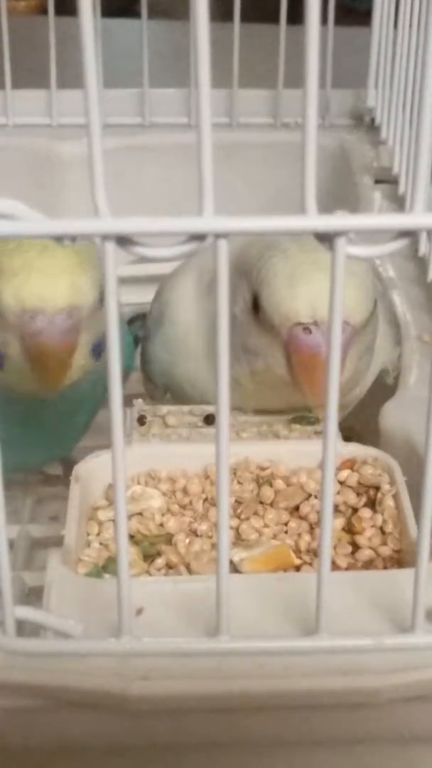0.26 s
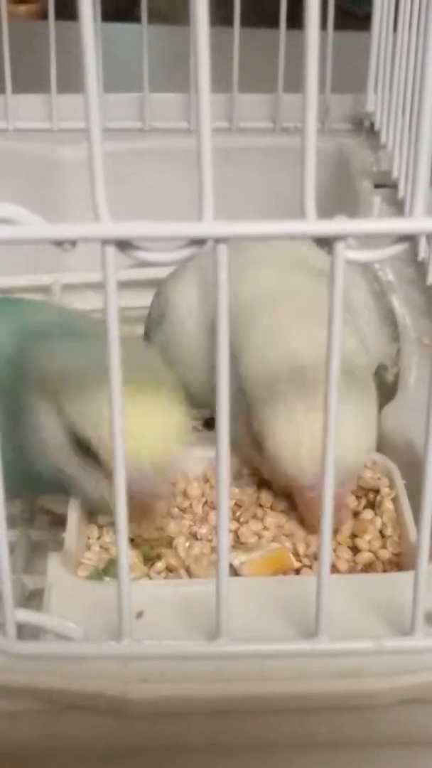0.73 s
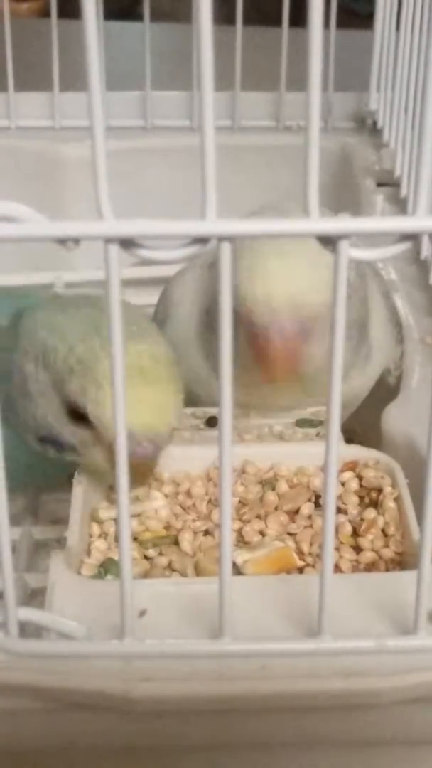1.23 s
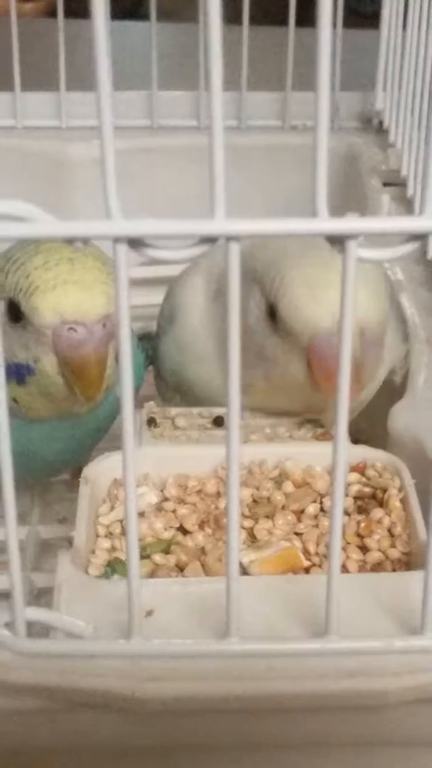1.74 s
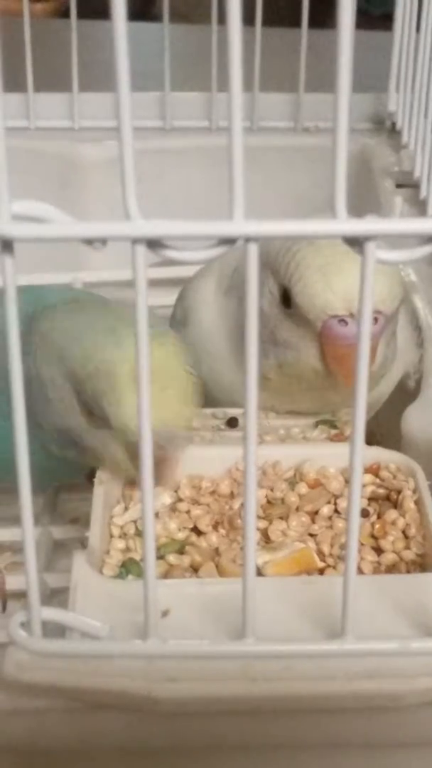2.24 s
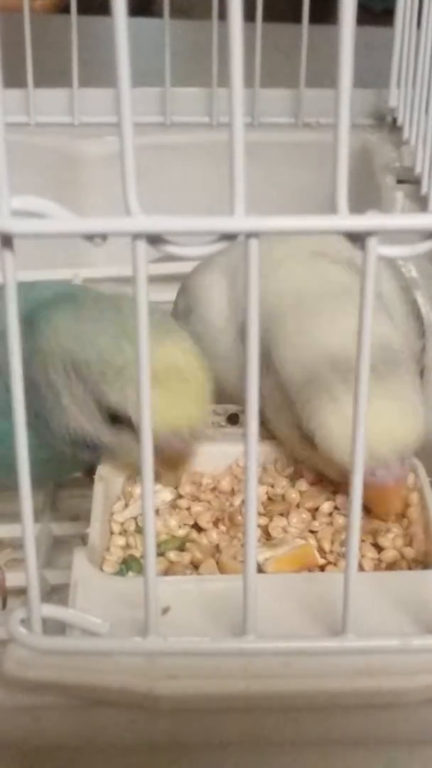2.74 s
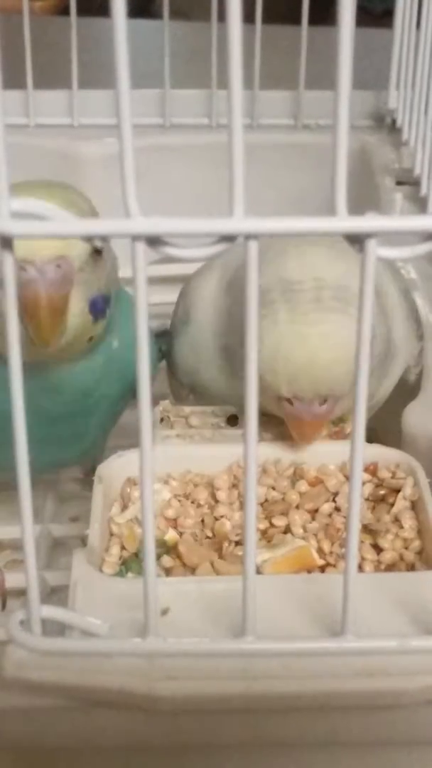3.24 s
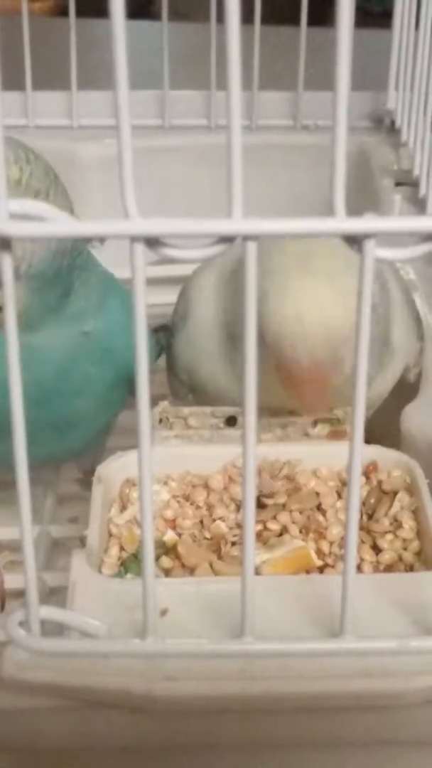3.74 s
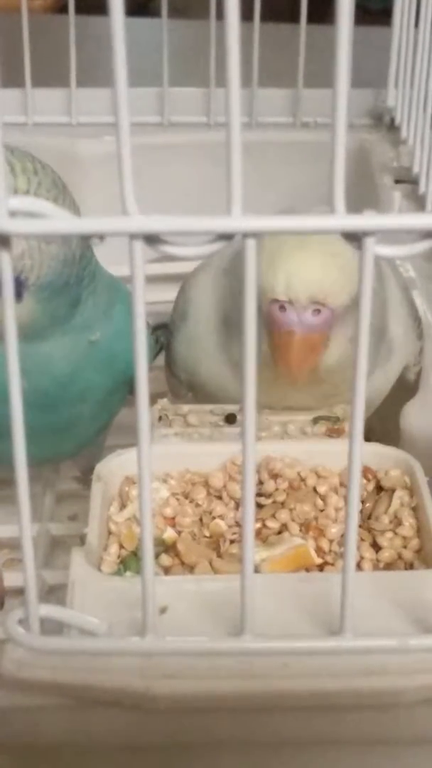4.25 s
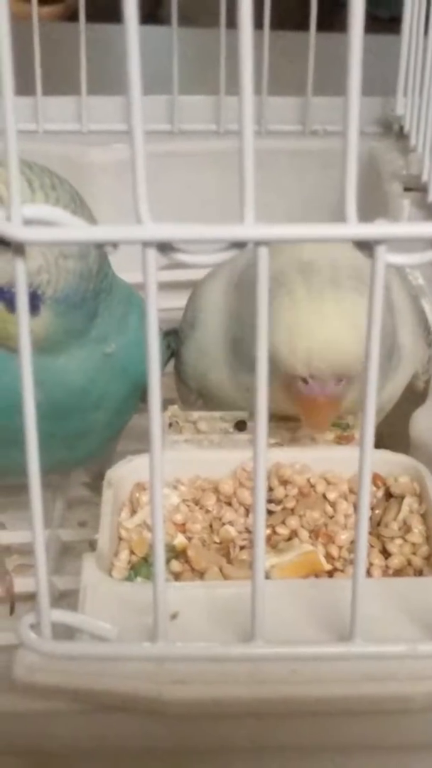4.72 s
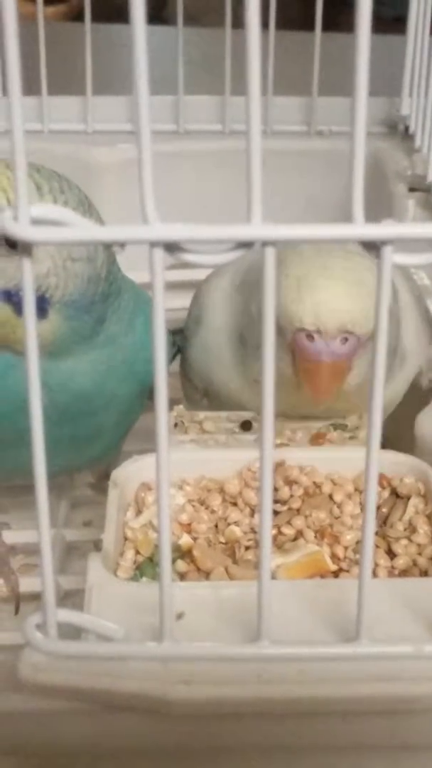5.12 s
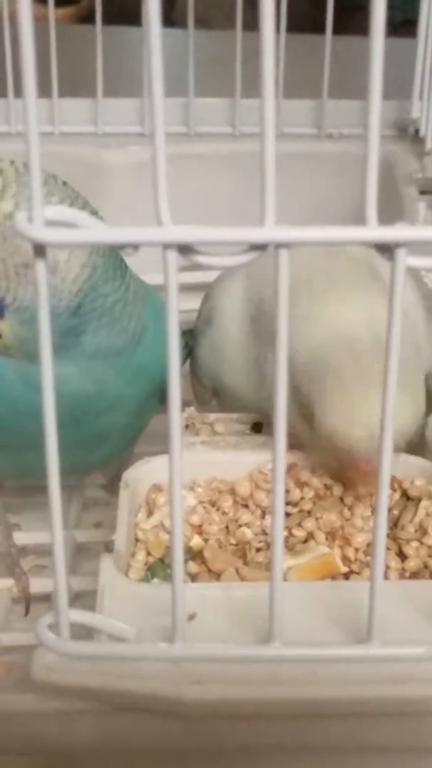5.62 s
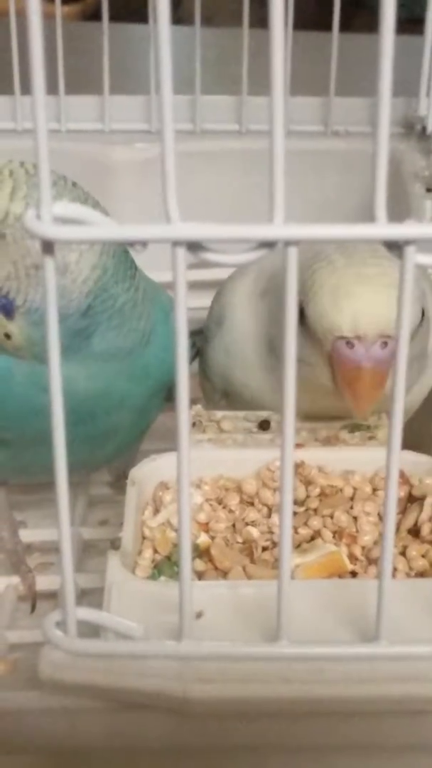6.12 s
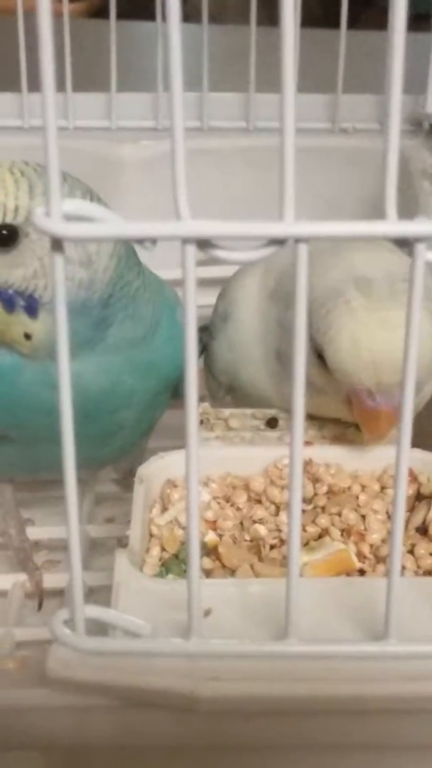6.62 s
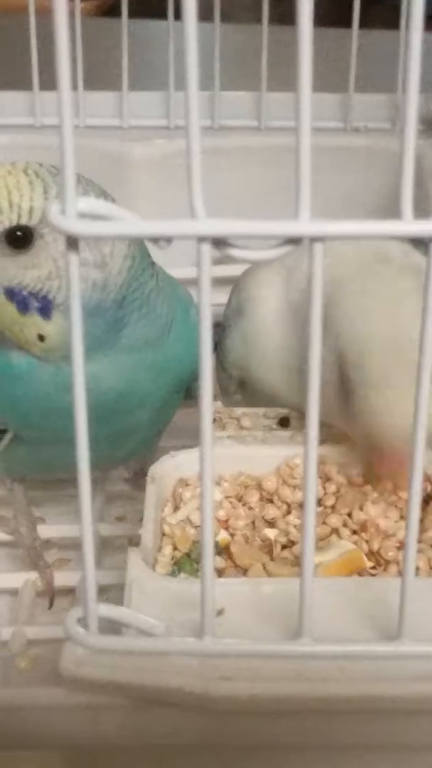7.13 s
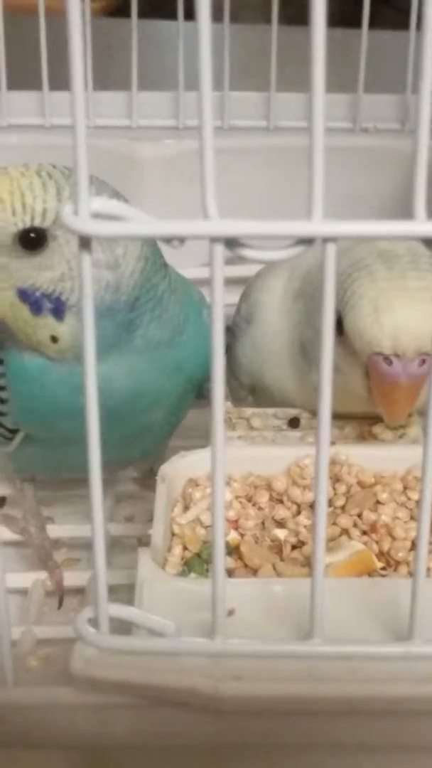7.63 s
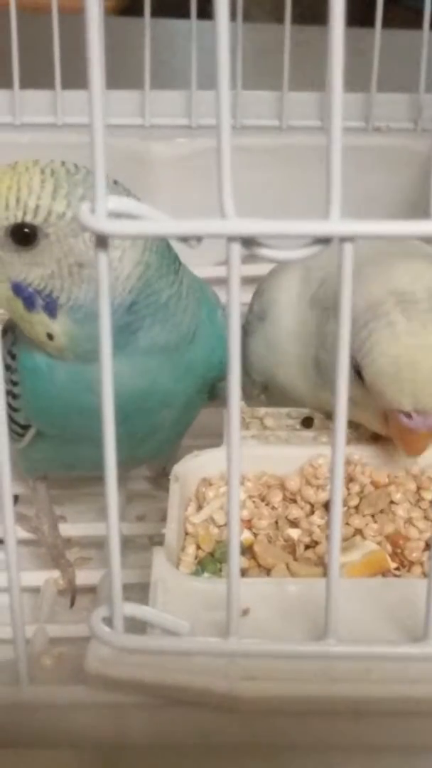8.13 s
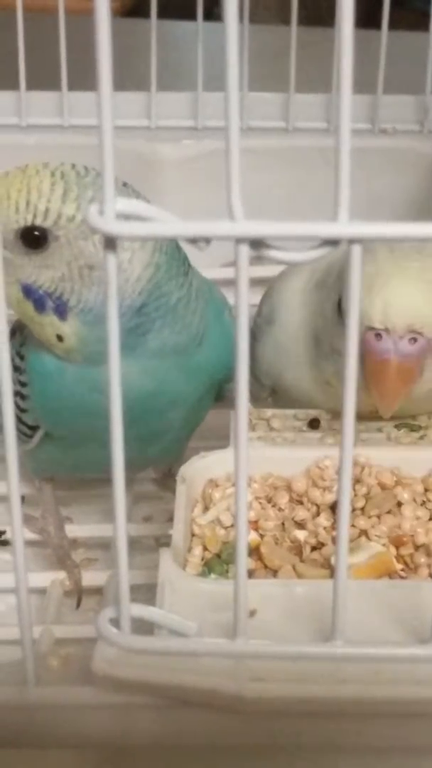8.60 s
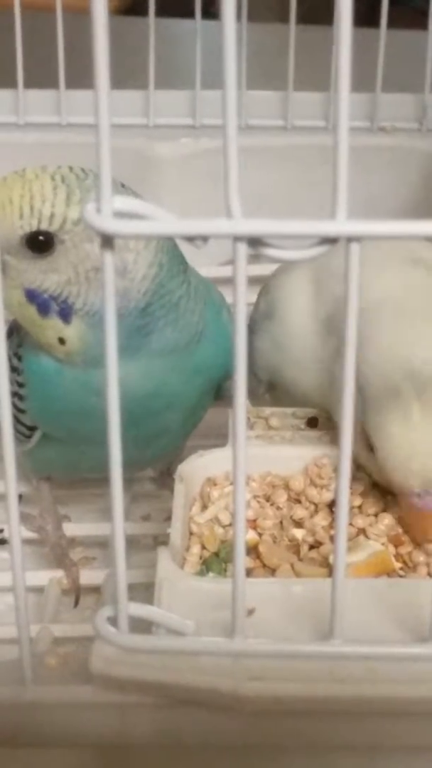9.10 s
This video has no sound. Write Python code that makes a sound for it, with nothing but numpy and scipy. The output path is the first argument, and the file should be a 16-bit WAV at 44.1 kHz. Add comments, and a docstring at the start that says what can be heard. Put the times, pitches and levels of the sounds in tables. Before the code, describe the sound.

Two parakeets feed in a wire cage indoors. Dry, bright husk snaps come irregularly from the start, singly and in tight clusters. Beaks dig into the seed heap with brief grainy rustles and sometimes knock the plastic dish, with dull low thuds as the cage sways. A steady low motor hum and soft hiss lie beneath, heard by a close phone microphone in a small room.

```python
"""Two small parakeets husk seeds at a plastic dish in a wire cage, close to a phone microphone.
A household motor hums from start to end, as sines and narrow noise over the room's air noise.
Husks snap from the first moment on, as short noise bursts through resonances, and echo off near walls.
From 0.7 s on beaks dig in the seed heap, as dense grains, and knock the dish, a push that rings it.
From 0.9 s on lunges sway the cage, as low sine swells; the last husks snap at about 9 s."""
import sys
import numpy as np
from scipy import signal
from scipy.fft import rfft, irfft, next_fast_len
from scipy.io import wavfile
from scipy.ndimage import map_coordinates

SR = 44100
rng = np.random.default_rng(int(sys.argv[2]) if len(sys.argv) > 2 else 0)


def boost(x):
    """Linear amplitude factor 10**(x/20) for a level x in decibels (scalar or array-like)."""
    u = np.asarray(x, float) / 20
    return 10 ** u


def output_pcm(signal):
    """Save a mono or channel-first signal as 16-bit PCM at the path in sys.argv[1].

    Samples are clipped to [-1, 1] before scaling.
    """
    pcm = np.clip(np.atleast_2d(signal).T, -1, 1) * 32767
    wavfile.write(sys.argv[1], SR, np.round(pcm).astype(np.int16))


N = 412776

# husk snaps: (t/s, hollow part level/dB, body part level/dB, sharp part level/dB, brightness of the body/dB)
# a part's level is the rms it would have with all its energy within 1 ms
SNAPS = [(0.0353, -58, -54.5, -56, 1), (0.272, -60, -52, -51, -10), (0.4174, -78, -62, -57, -2),
         (0.4847, -62, -59.5, -59, 4), (0.5051, -73, -60, -56, 2), (0.6978, -48, -53, -68, 15),
         (0.891, -63, -58, -69, 1), (0.9306, -71, -60, -62, -3), (0.9398, -70, -59, -64, -5),
         (0.945, -70, -51, -56, 1), (0.9644, -51, -39, -41, -1.5), (0.9696, -79, -52, -45, 4),
         (1.0152, -53.5, -62, -72, 1), (1.235, -64, -51, -62, 10), (1.2896, -50.5, -44, -49, 9),
         (1.311, -69, -53, -62, -10), (1.4533, -56, -43.5, -47, 9), (1.458, -45.5, -41.5, -34, -2),
         (1.474, -67, -62, -69, -1), (1.7336, -63, -56, -70, -2), (1.783, -62, -52.5, -72, 4),
         (1.9066, -51.5, -43.5, -42, 0), (1.965, -56, -47.5, -55, 5), (1.9915, -50, -56, -58, 4),
         (2.2474, -53.5, -58, -58, -8), (2.476, -51.5, -49.5, -51.5, 0), (2.482, -55, -59, -72, 1),
         (2.6125, -53.5, -48.5, -39, 5), (2.826, -74, -55, -72, 11), (2.8346, -68, -54.5, -74, 4),
         (2.9303, -64, -66, -60, 5), (2.9609, -69, -64, -58, -4), (3.107, -47.5, -47.5, -48, 5),
         (3.1148, -59, -69, -60, -5), (3.251, -54, -58, -68, 6), (3.2647, -57, -41, -46, 7),
         (3.638, -72, -56, -65, 13), (3.6413, -67, -57.5, -66, 3), (4.1028, -63, -61, -69, 6),
         (4.106, -64, -56, -59, 5), (4.111, -67, -61, -65, -3), (4.367, -48, -48, -55, 6),
         (4.4048, -70, -39.5, -48, 4), (4.5064, -45, -47.5, -43, 7), (4.5607, -55, -59, -66, 5),
         (4.658, -56, -47.5, -54, -1), (4.683, -73, -51, -60, 12), (4.686, -73, -48.5, -47, 9),
         (4.768, -55.5, -48, -64, 3), (5.057, -51, -57, -76, -9), (5.212, -57, -52, -60, -4),
         (5.2144, -46.5, -50, -55, 5), (5.2441, -62, -50, -59, 3), (5.2489, -67, -69, -59, 4),
         (5.3029, -58, -56, -65, 8), (5.3572, -49.5, -39.5, -49, -4), (5.392, -76, -59, -56, 5),
         (5.6294, -59, -53.5, -64, 6), (5.769, -60, -55.5, -64, -2), (6.0016, -58, -55, -65, 9),
         (6.1568, -51.5, -47.5, -47.5, -6), (6.2471, -79, -60, -63, 7), (6.3071, -71, -63, -64, 0),
         (6.349, -68, -58, -68, -5), (6.3532, -72, -55, -60, -6), (6.364, -53, -48.5, -54, -12),
         (6.4273, -61, -63, -58, 13), (6.665, -59, -55, -59, -3), (6.685, -60, -56, -70, -10),
         (6.7146, -60, -54, -63, 5), (6.8792, -61, -55.5, -60, -1), (7.171, -71, -58, -72, 9),
         (7.297, -56, -61, -70, 1), (7.3482, -63, -57.5, -71, 1), (7.4, -51, -48, -59, -15),
         (7.405, -48.5, -43.5, -40.5, 0), (7.4462, -64, -53, -54, 7), (7.5, -60, -58, -49, -5),
         (7.5038, -61, -49.5, -54, -9), (7.539, -58, -55.5, -53, 1), (7.7935, -55.5, -48.5, -53, -5),
         (7.8495, -61, -43, -44.5, 7), (7.8575, -67, -52, -59, -5), (7.8883, -79, -78, -56, 1),
         (8.004, -72, -56, -53, 5), (8.0233, -60, -47.5, -53, 9), (8.027, -56, -53, -50, 8),
         (8.0827, -80, -59, -71, 7), (8.364, -81, -57, -65, 8), (8.7259, -60, -55, -50, -3),
         (8.7838, -50, -43.5, -50, 2), (8.8426, -61, -58, -65, 5), (8.9317, -56, -52, -51, 3),
         (8.9347, -65, -57, -56, 9), (9.0023, -55, -46.5, -68, -9), (9.0445, -52.5, -47, -71, 2),
         (9.1935, -62, -57, -63, 9)]
# resonances of the sharp, highest part of a snap: (f/Hz, width/Hz, level/dB)
SHARP_MODES = [(9500, 5000, -0.5), (13300, 1500, 7), (15040, 2200, 6.5)]
# resonances of the plastic dish: (f/Hz, width/Hz, level/dB of a single pass)
DISH_MODES = [(302, 110, -2.5), (502, 100, 3), (663, 120, 1), (808, 190, 0), (1100, 370, -8),
              (1500, 250, -5.5), (2210, 210, -8.5), (3100, 370, -11.5)]
# a beak digs into the seed heap: (t/s of full strength, hold/s, hollow rustle level/dB, body rustle level/dB)
DIGS = [(.705, 0.0085, -73, -87), (0.881, 0.023, -69, -69), (1.465, 0.018, -72, -67),
        (1.737, .03, -69, -72), (1.777, 0.012, -64.5, -66), (1.836, 0.087, -76, -89),
        (2.832, .05, -71, -79), (2.933, 0.037, -70, -67.5), (3.57, 0.037, -73, -75),
        (3.63, 0.011, -71, -74), (3.679, 0.028, -67, -73), (4.105, 0.022, -73, -84),
        (5.058, 0.017, -64.5, -77), (5.099, 0.019, -71, -67.5), (5.995, 0.012, -74, -71.5),
        (6.882, 0.011, -77, -84), (7.173, 0.038, -79, -84), (8.1, .012, -84, -75)]


def unit(x):
    """Scaled to rms 1."""
    return x / np.sqrt(np.mean(x ** 2) + 1e-20)


def along(points, hz):
    """(f/Hz, value) points read on a log frequency axis."""
    f, v = np.transpose(points)
    return np.interp(np.log(hz + 1), np.log(f + 1), v, left=v[0], right=v[-1])


def wobble(rate):
    """A smooth random curve, rate knots a second."""
    knots = rng.standard_normal(int(N * rate / SR) + 4)
    return map_coordinates(knots, [np.arange(N) * rate / SR])


def filtered(x, response):
    """x times a complex response of frequency, along the last axis."""
    n = x.shape[-1]
    m = next_fast_len(n + 4096)
    return irfft(rfft(x, m) * response(np.fft.rfftfreq(m, 1 / SR)), m)[..., :n]


def ringing(modes, scatter_db=0):
    """Causal response of a few resonances; scatter_db gives each mode its own strength in each row."""
    extra = np.broadcast_to(scatter_db, np.shape(scatter_db)[:-1] + (len(modes),))

    def response(f):
        total = 0
        for k, (centre, width, db) in enumerate(modes):
            resonance = 1j * f * width / (centre * centre - f * f + 1j * f * width)
            total = total + (-1) ** k * boost(db + extra[..., k, None]) * resonance
        return total
    return response


def coloured(spectrum):
    """Steady noise of rms 1, shaped by (f/Hz, level/dB) points."""
    return unit(filtered(rng.standard_normal(N), lambda hz: boost(along(spectrum, hz))))


def narrow_noise(hz, width):
    """Steady noise of rms 1 through one resonance."""
    return unit(filtered(rng.standard_normal(N), ringing([(hz, width, 0)])))


def placed(times, rows):
    """Sum of short sounds, one row at each time."""
    at = np.round(np.asarray(times) * SR).astype(int)[:, None] + np.arange(rows.shape[1])
    return np.bincount(at.ravel(), rows.ravel(), N + SR)[:N]


def hiss():
    """The microphone's own steady noise."""
    # hiss spectrum, relative: (f/Hz, level/dB)
    hiss_shape = [(1470, -33), (2500, -19), (2810, -2), (3860, -7.5), (4990, -8.5), (5690, -5.5),
                  (6760, -11.5), (7710, -9), (10400, -6), (15200, -9), (16000, -9)]
    return boost(-71.0) * coloured(hiss_shape)


def hum():
    """Steady motor sines, narrow drones of resonant noise, and broad air noise."""
    # motor tones: (f/Hz, rms level/dB, waver/dB)
    motor_tones = [(54.56, -74, 5), (59.3, -67, 1), (119.86, -47, 0.1), (326.4, -76, 0), (358, -85, -1)]
    # fuzzy drones: (f/Hz, width/Hz, rms level/dB)
    drone_bands = [(216, 4.8, -74.5), (287.2, 12, -78.5), (1681, 28, -80.5), (2748, 47, -82.5)]
    # slow course of one more drone, at 290.1 Hz: (t/s, rms level/dB)
    drone_course = [(0, -69), (1.85, -66.5), (3.1, -72), (4.3, -80), (5.3, -67), (6.2, -72), (7.5, -68),
                    (9.36, -73)]
    # air noise spectrum, relative: (f/Hz, level/dB)
    air_shape = [(35, -40), (50, -24), (75, -10), (100, -3), (150, -6.5), (172, -11), (230, -8),
                 (320, -11.5), (430, -17.5), (700, -23.5), (1400, -27), (2000, -28.5), (2800, -33),
                 (3100, -40)]
    t = np.arange(N) / SR
    tones = 0
    for hz, db, waver_db in motor_tones:
        sine = np.sin(2 * np.pi * (hz * t + rng.random()))
        tones = tones + np.sqrt(2) * boost(db + waver_db * wobble(2.87)) * sine
    drones = sum(boost(db) * narrow_noise(hz, width) for hz, width, db in drone_bands)
    s, db = np.transpose(drone_course)
    drones += boost(np.interp(t, s, db) + 1.64 * wobble(3.3)) * narrow_noise(290.1, 4.2)
    air = coloured([(20, -32)] + air_shape + [(4500, -51)])
    return tones + drones + boost(-58.0 + 0.6 * wobble(1.76)) * air


def swishes():
    """Faint airy swells of narrow noise high in the treble, each passed twice through one resonance."""
    # (t/s of the peak, half length/s, f/Hz, width/Hz of a single pass, rms level/dB at the peak)
    swells = [(.03, 0.12, 9700, 1500, -78), (2.78, 0.16, 9900, 1500, -79), (4.03, .17, 9770, 1600, -78),
              (6.03, 0.14, 9500, 1200, -77.5)]
    t = np.arange(N) / SR
    out = 0
    for s, half, hz, width, db in swells:
        colour = ringing([(hz, width, 0)])
        noise = unit(filtered(rng.standard_normal(N), lambda f: colour(f) ** 2))
        out = out + boost(db) * np.exp(-((t - s) / half) ** 4) * noise
    return out


def room(x):
    """Each frequency of the near walls' answer dies at its own speed; the tail is new every third of a second."""
    # decay of the near room: (f/Hz, t60/s)
    decay = [(500, 0.53), (2500, 0.018), (5600, 0.066), (12000, 0.049)]
    out, step = np.zeros(N + SR), SR // 3
    for a in range(0, N, step):
        hz, t, z = signal.stft(rng.standard_normal(SR // 4), SR, nperseg=128)
        dull = boost(along([(5000, -2.5), (10000, -6.5)], hz))[:, None]  # soft things swallow the treble
        fade = boost(-60 * t / along(decay, hz)[:, None])
        tail = signal.istft(z * dull * fade, SR, nperseg=128)[1]
        wet = signal.fftconvolve(x[a:a + step], tail / np.linalg.norm(tail))
        out[a + 60:][:len(wet)] += wet  # the answer starts 60 samples late
    return out[:N]


def shakes():
    """A lunge sways the cage at its lowest mode, swelling and fading within a few cycles."""
    # (t/s of the peak, peak level/dB, f/Hz)
    lunges = [(0.901, -53, 97), (1.769, -43.5, 109), (2.971, -49, 101), (3.66, -51, 103.3),
              (4.13, -48, 105), (4.852, -52, 95.5), (5.089, -47.5, 99), (5.799, -51, 106), (6.9, -59, 96),
              (7.22, -56, 97.5), (8.22, -55, 91)]
    s, db, hz = np.transpose(lunges)[..., None]
    t = np.arange(-4000, 8000) / SR
    swell = np.exp(-(t / np.where(t < 0, .035, .05)) ** 2)
    phase = 2 * np.pi * rng.random(s.shape)
    return placed(s[:, 0] + t[0], boost(db) * swell * np.sin(2 * np.pi * hz * t + phase))


def ticks():
    """Faint stray ticks of beaks working a seed: random impulses, about 14 a second, through sharp modes."""
    impulses = (rng.random(N) < 14 / SR) * rng.standard_normal(N)
    return boost(-87) * unit(filtered(impulses, ringing(SHARP_MODES[:2])))


def digs():
    """Rise, hold and fall of every dig: gain per dig and sample."""
    rise_db_per_s, fall_db_per_s = 902, 190
    s, hold = np.transpose(DIGS)[:2, :, None]
    t = np.arange(N) / SR
    rise = rise_db_per_s * (t - s)
    fall = fall_db_per_s * (s + hold - t)
    return boost(np.minimum(0, np.minimum(rise, fall)))


def stir(column, crumb_db):
    """Rustle strength, hollow (0) or body (1): chewing, digs and the crumbs of each snap add in power."""
    chew_db = (-90, -82)  # constant faint chewing: hollow, body
    crumb_t60_s = 0.52
    chew_power = boost(chew_db[column]) ** 2
    dig_power = boost(np.array(DIGS)[:, 2 + column]) ** 2 @ digs() ** 2
    rows = np.array(SNAPS)
    t = np.arange(SR // 2) / SR
    crumbs = boost(rows[:, 1 + column, None] + crumb_db - 60 * t / crumb_t60_s)
    return np.sqrt(chew_power + dig_power + placed(rows[:, 0], crumbs ** 2))


def rustle():
    """Dense tiny contacts between seeds ring the heap and the dish under them."""
    # the stirred heap's low and high resonances: (f/Hz, width/Hz, level/dB), all of a single pass
    heap_low = [(2020, 870, -8.5), (2580, 630, 1)]
    heap_high = [(4530, 3000, -5), (5780, 450, 2), (6260, 1180, -6.5)]
    # crumbs start this far under the same part of their snap
    hollow, body = stir(column=0, crumb_db=-38), stir(column=1, crumb_db=-31)
    out = 0
    for modes, gain in ((DISH_MODES, boost(-2) * hollow), (heap_low, hollow), (heap_high, body)):
        contacts = rng.random(N) < 1500 / SR  # 1500 a second
        grains = contacts * rng.standard_normal(N) * boost(2.4 * rng.exponential(size=N))
        colour = ringing(modes)
        out = out + gain * unit(filtered(grains, lambda f: colour(f) ** 2))  # two passes
    return out


def knocks():
    """A blunt beak blow, then seeds settling, both ringing the dish."""
    # (t/s, peak level/dB, t60/s of the settling, lift of the 1100 Hz rim mode/dB)
    beak_blows = [(0.6967, -37.5, 0.051, 0), (1.733, -51, 0.1, 4), (1.782, -55, 0.097, 14),
                  (2.182, -63, 0.057, 13), (3.775, -53, .06, 14), (4.078, -50, 0.027, 16),
                  (5.055, -50.5, 0.088, 10)]
    s, db, t60, lift_db = np.transpose(beak_blows)
    t = np.arange(4096) / SR
    push = 1.8 * boost(-60 * t / 0.00078)
    settling = .5 * boost(-60 * t / 0.005) + 0.44 * boost(-60 * t / t60[:, None])
    force = push + rng.standard_normal((len(s), len(t))) * settling
    rim = np.abs(np.array(DISH_MODES)[:, 0] - 1050) < 100
    ring = filtered(force, ringing(DISH_MODES, lift_db[:, None] * rim))
    return placed(s, ring / np.abs(ring).max(1, keepdims=True) * boost(db)[:, None])


def small_snaps():
    """Random weak snaps, denser while a beak digs; rows like SNAPS."""
    rest_per_s, extra_dig_per_s = 5, 60
    level_db, scatter_db = (-68, -68, -74), 3  # hollow, body, sharp
    rate = rest_per_s + extra_dig_per_s * digs().max(0)
    s = np.flatnonzero(rng.random(N) < rate / SR) / SR
    luck = rng.standard_normal((len(s), 4))
    return np.column_stack([s, level_db + scatter_db * luck[:, :3], 5 * luck[:, 3]])


def snaps():
    """A husk breaks in a step and splinters, coloured by resonances, probably of the phone's microphone and case."""
    # resonances of the two lower parts of a snap: (f/Hz, width/Hz, level/dB)
    hollow_modes = [(2210, 780, 6), (2655, 340, 5)]
    body_modes = [(4320, 820, 3), (5770, 440, 3), (6530, 600, -2.5)]
    s, *levels, bright_db = np.vstack([SNAPS, small_snaps()]).T
    t = np.arange(768) / SR
    luck = rng.standard_normal((len(s), len(t) + 10))
    splinter_t60 = .007 * boost(2.5 * luck[:, -1:])  # seconds
    force = .13 * luck[:, :len(t)] * boost(-60 * t / splinter_t60)
    force[:, 0] = np.sign(luck[:, 0])  # the sharp step
    lean = (0, bright_db[:, None] * [-.5, .5, .2], 0)  # brightness tips the body between its low and high modes
    out = 0
    for k, (modes, db) in enumerate(zip((hollow_modes, body_modes, SHARP_MODES), levels)):
        mode_luck = luck[:, len(t) + 3 * k:][:, :len(modes)]
        colour = ringing(modes, lean[k] + 1.9 * mode_luck)
        # a broad resonance favours each part's own range
        centre, span = np.mean(modes, 0)[0], np.ptp(modes, 0)[0]
        window = ringing([(centre, 1.2 * span + 700, 0)])
        part = filtered(force, lambda f: colour(f) * window(f))
        part /= np.linalg.norm(part, axis=1, keepdims=True) / np.sqrt(.001 * SR)  # energy of 1 ms at rms 1
        out = out + part * boost(db)[:, None]
    return placed(s, out)


def scene():
    """Birds in their room over the hum."""
    birds = snaps() + rustle() + knocks() + ticks()
    return (birds + boost(-12.0) * room(birds) + shakes() + swishes() + hum())[None]


def roll_off(x):
    """The treble ends steeply here."""
    return signal.sosfilt(signal.butter(12, 17330, fs=SR, output="sos"), x)


def record(dry):
    """The close microphone adds its hiss."""
    heard = dry + hiss()
    return roll_off(heard)


dry = scene()
out = record(dry)
output_pcm(out)
```